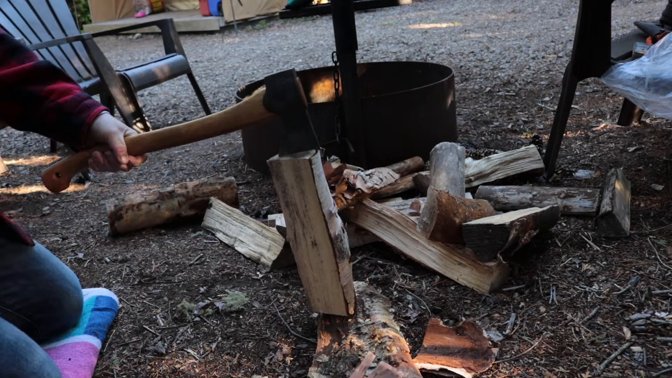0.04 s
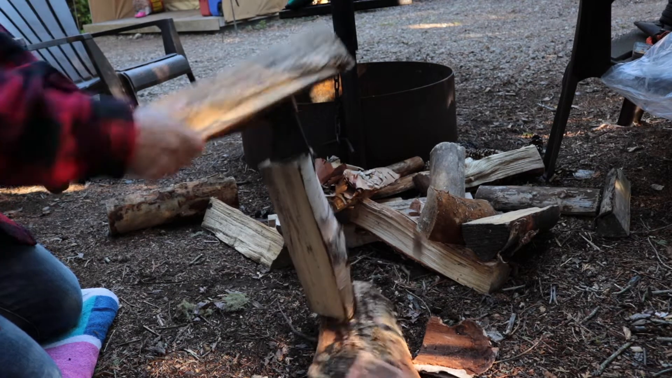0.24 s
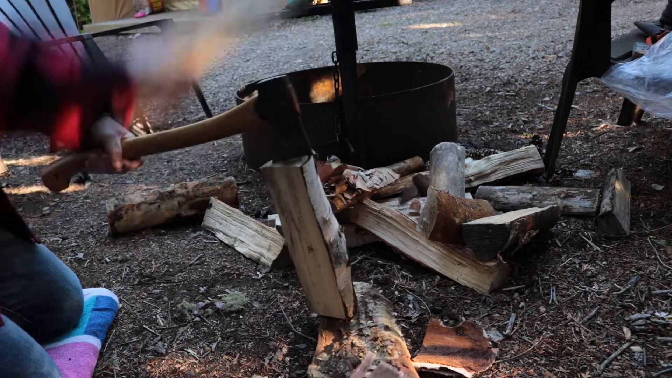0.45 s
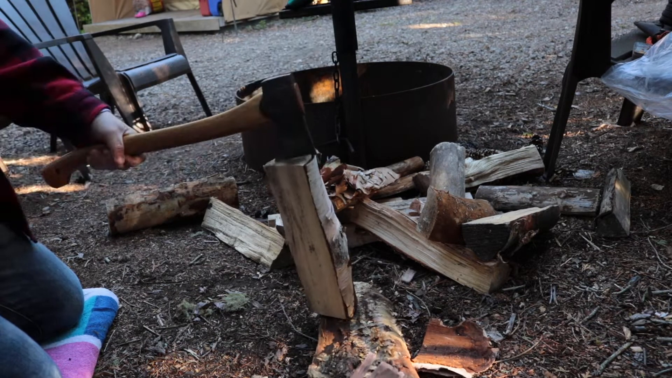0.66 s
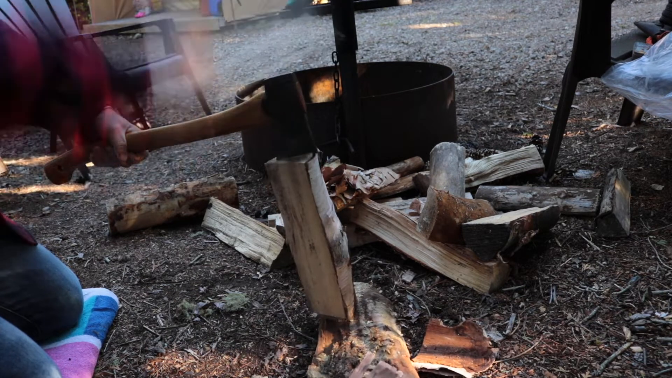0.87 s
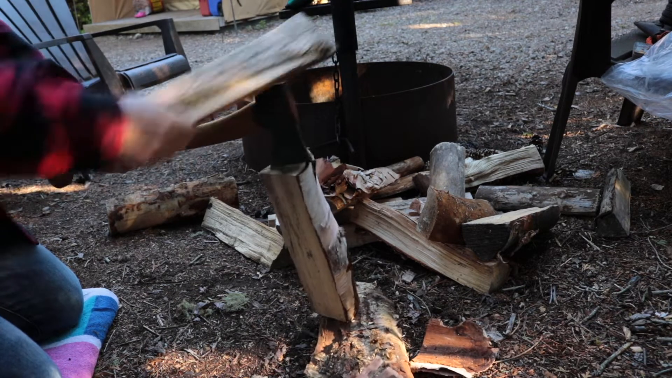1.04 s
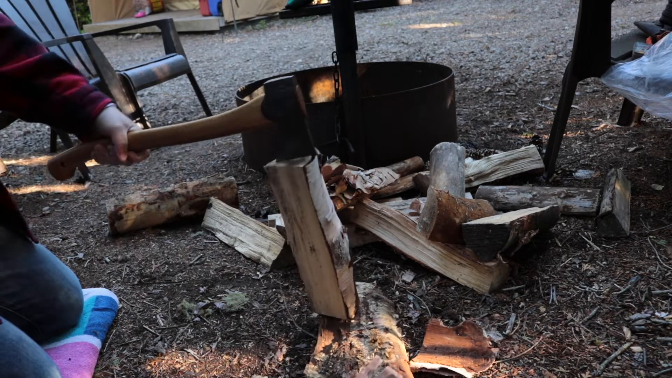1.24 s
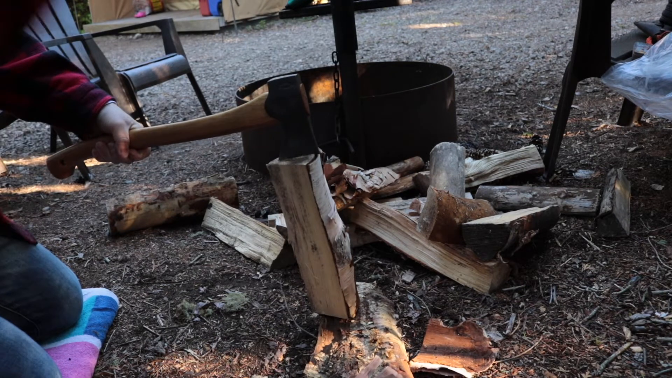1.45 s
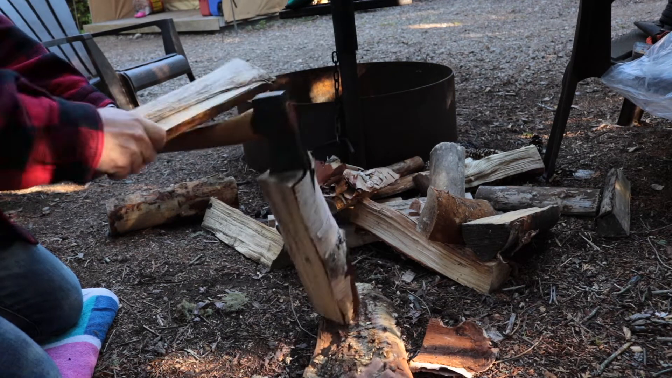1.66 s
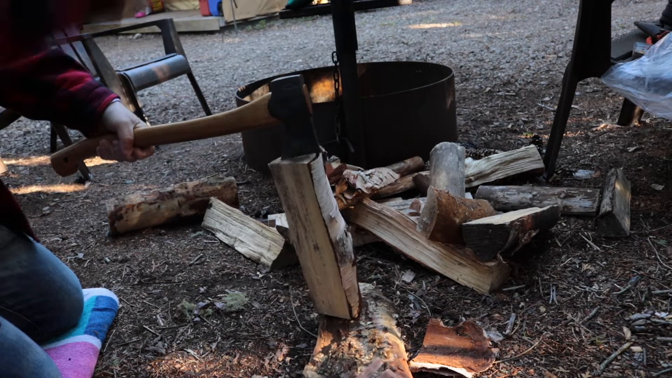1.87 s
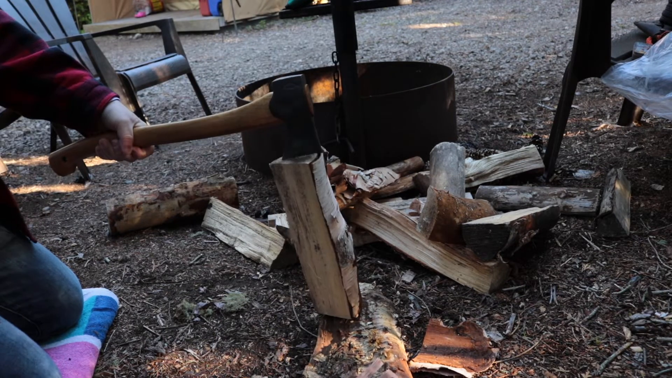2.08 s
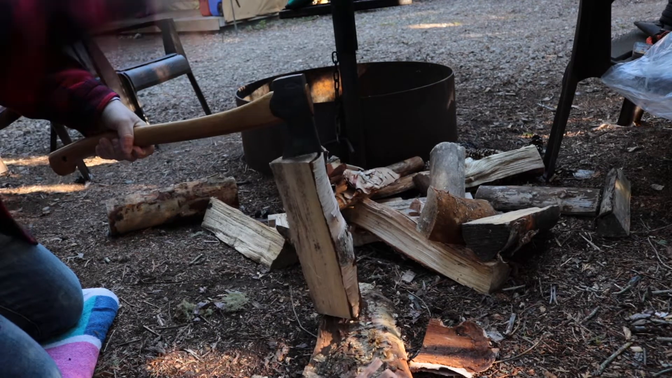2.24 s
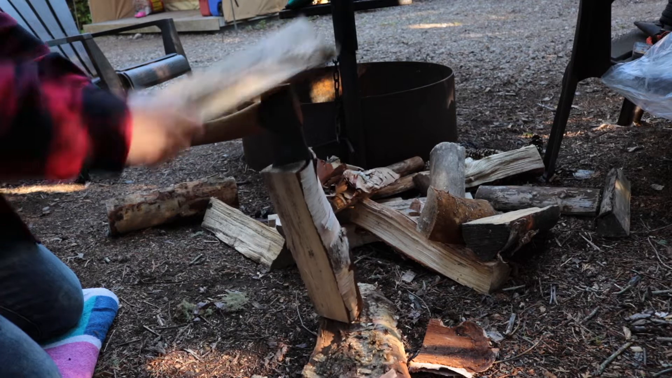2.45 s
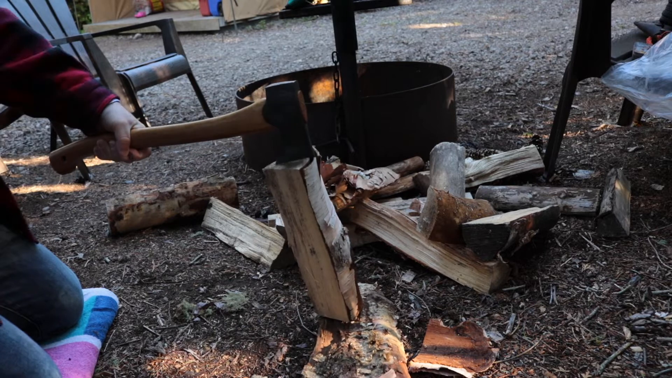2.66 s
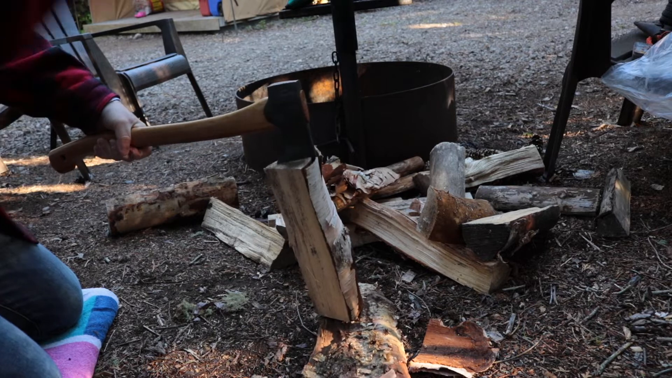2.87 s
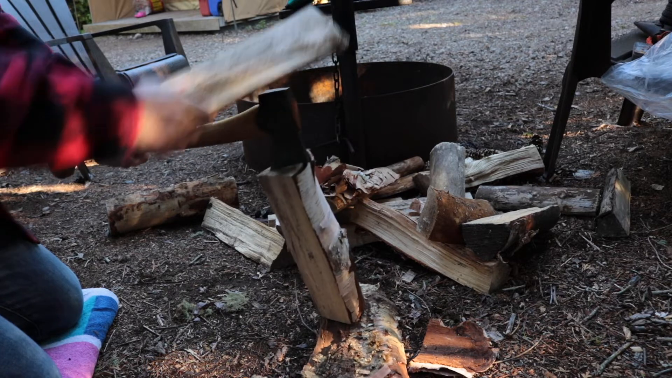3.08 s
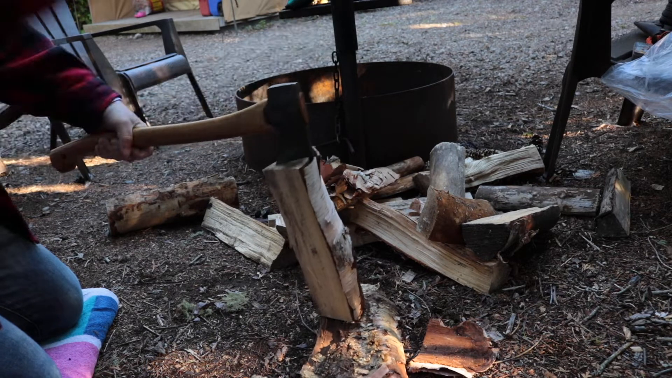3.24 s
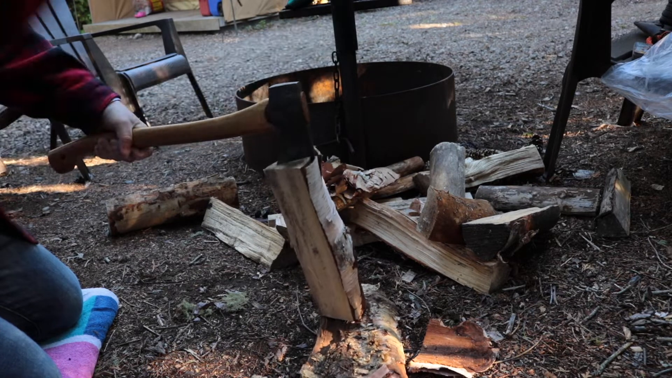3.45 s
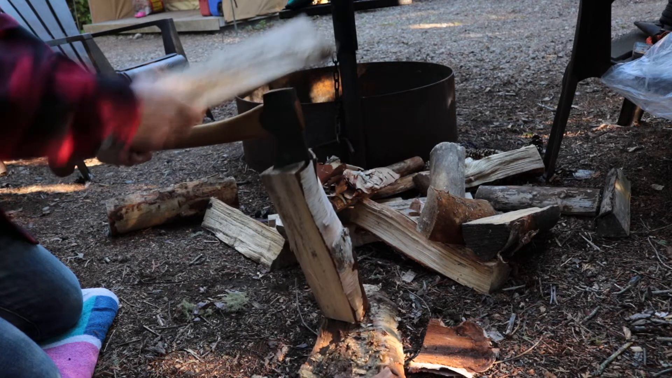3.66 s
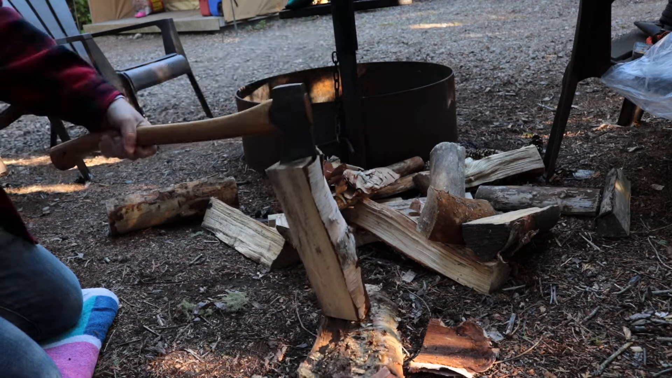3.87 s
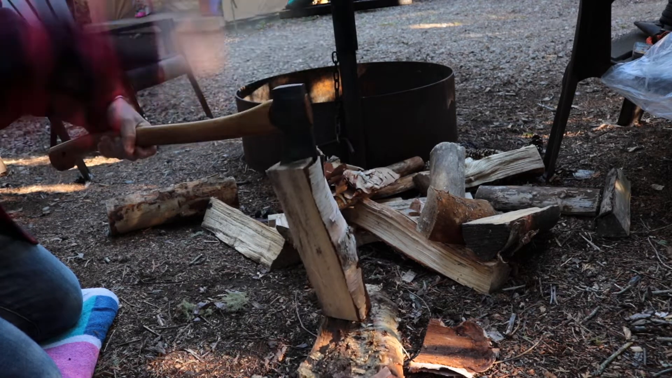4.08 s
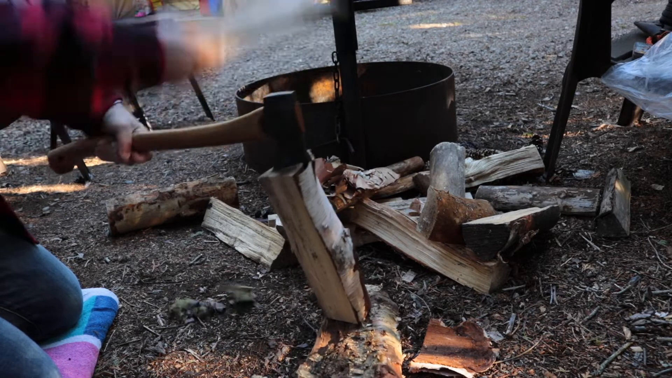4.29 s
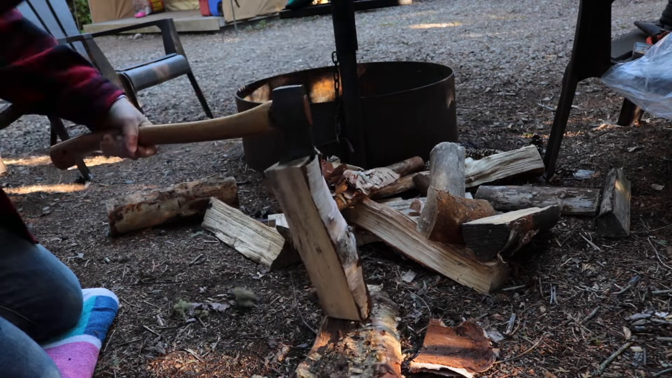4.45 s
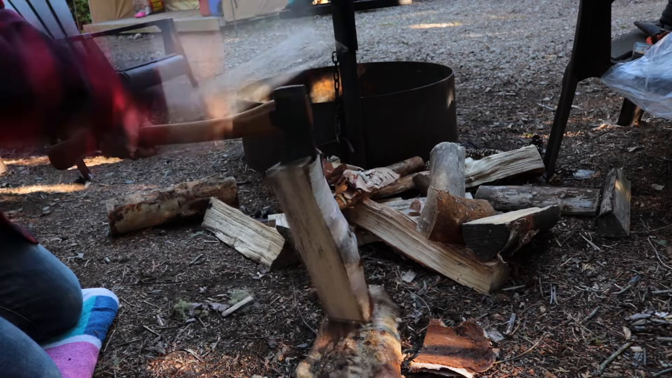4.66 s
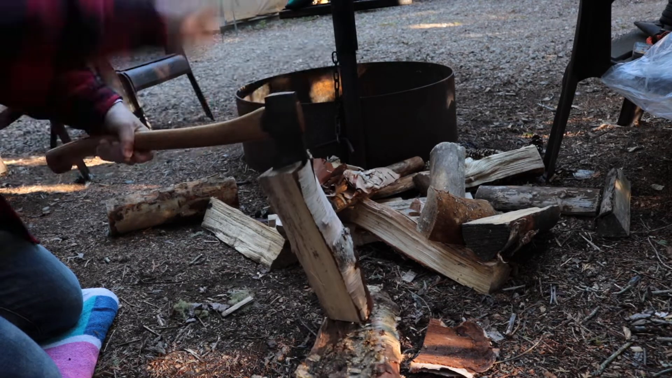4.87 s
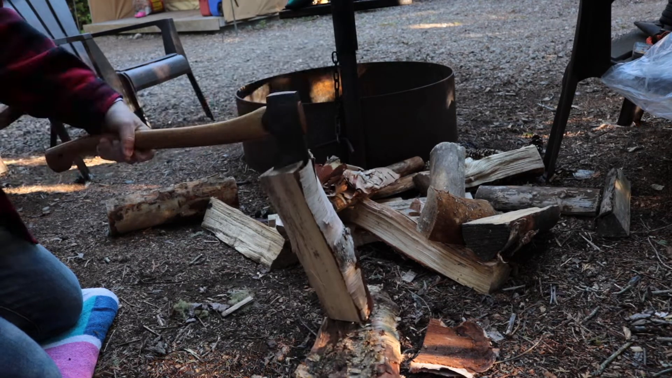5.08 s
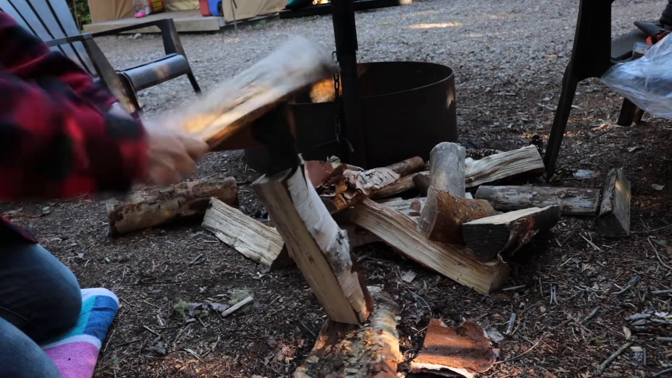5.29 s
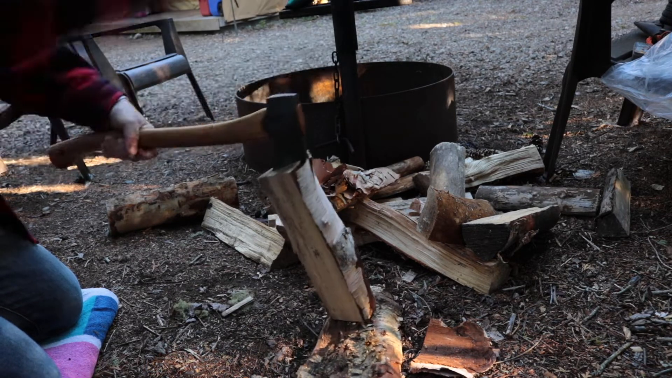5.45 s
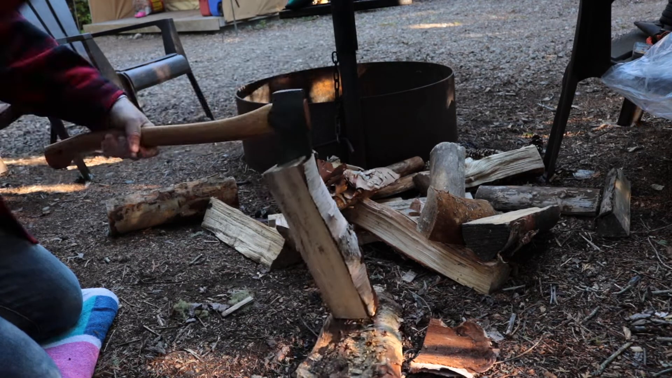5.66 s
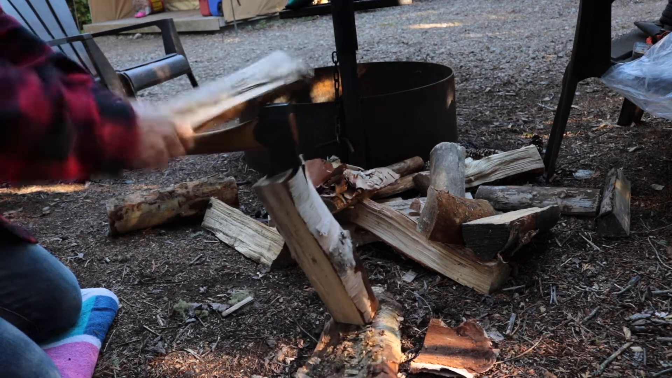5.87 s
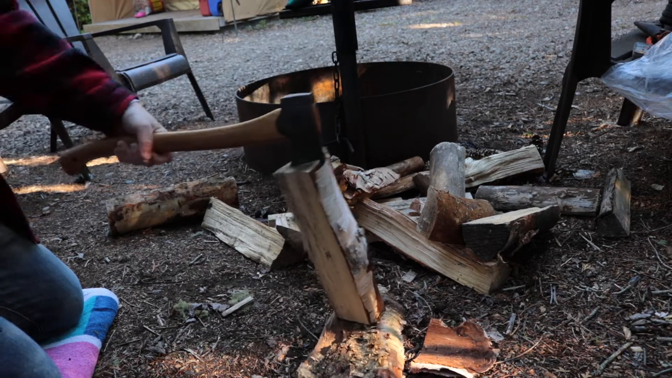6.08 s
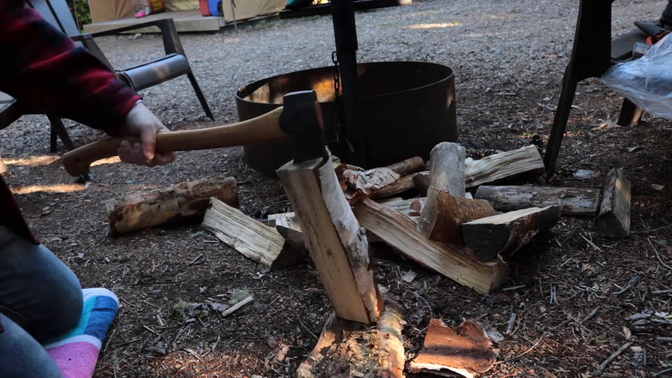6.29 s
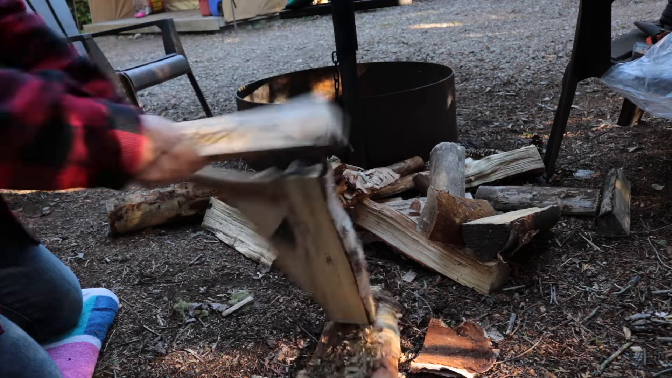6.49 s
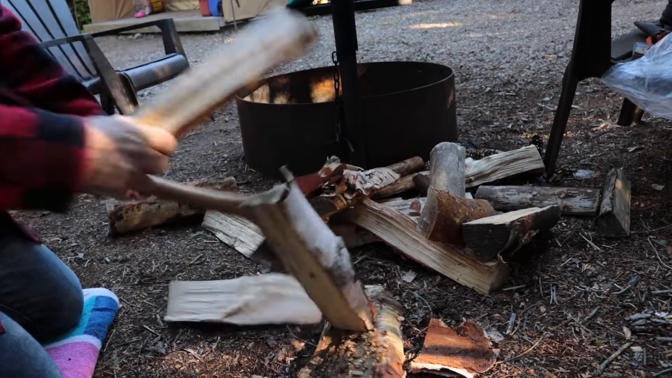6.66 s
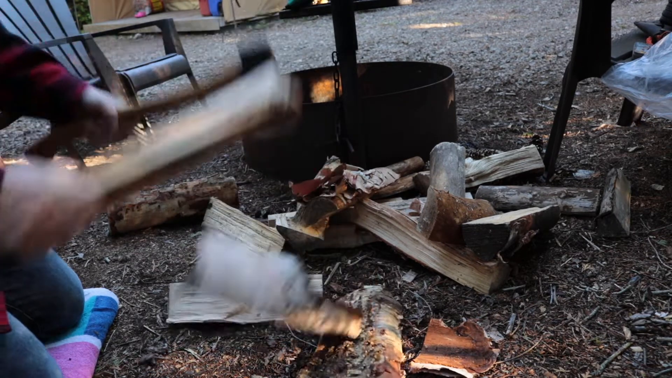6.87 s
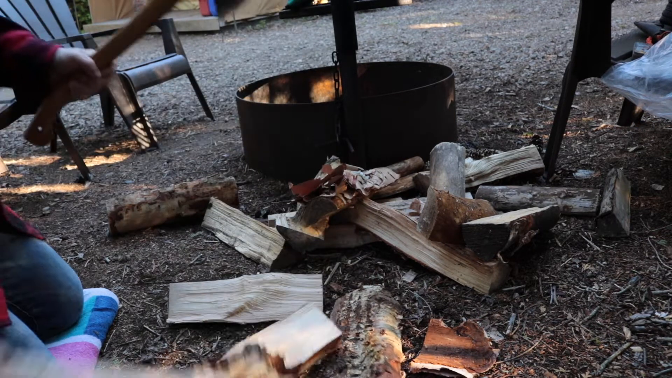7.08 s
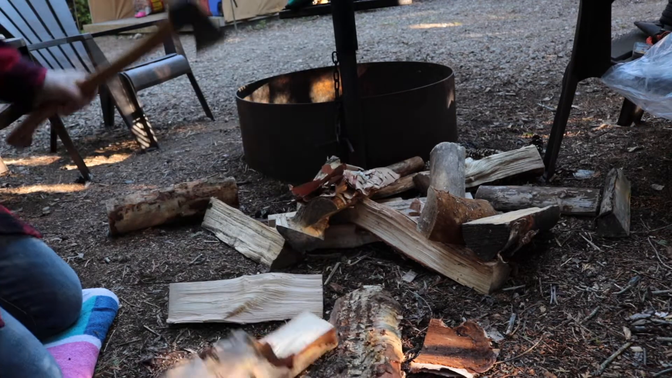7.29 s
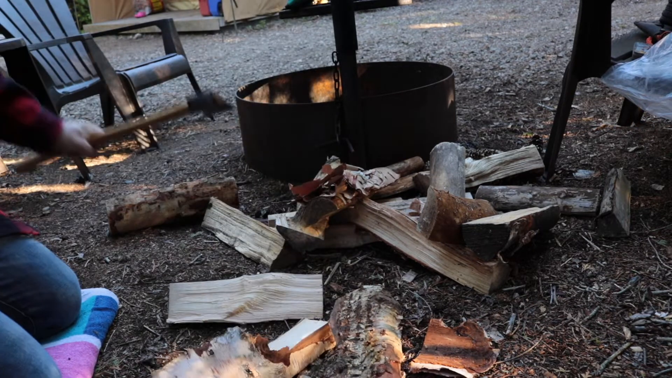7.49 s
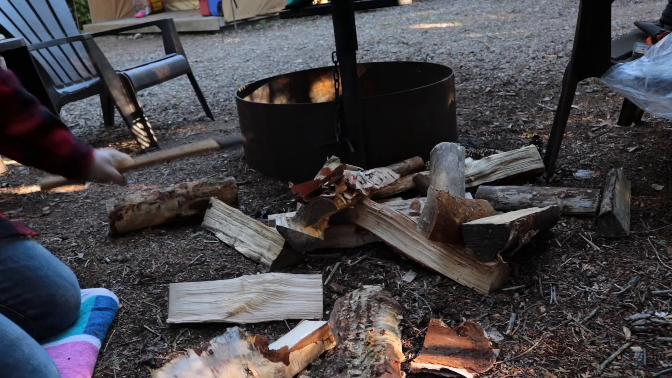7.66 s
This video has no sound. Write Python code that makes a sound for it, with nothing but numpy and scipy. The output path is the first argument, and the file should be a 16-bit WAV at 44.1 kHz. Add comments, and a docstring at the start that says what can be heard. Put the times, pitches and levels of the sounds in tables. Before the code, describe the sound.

A wooden baton knocks on the back of a hatchet lodged in a log, outdoors and close to the microphone. Eleven loud blows fall from 0.2 to 6.5 seconds, about 0.7 seconds apart at first, then slightly quicker. Each is a sharp, slightly distorted knock with a very short metallic ring and a faint echo from trees; all but the last add a low ground thump. The log bumps on its block, and small cracks come at about 2.5 and 4.4 seconds. Just before 6 seconds the log comes down with a hard extra clack, and a sleeve swishes softly. The blow at 6.5 seconds splits the wood with a splintering crack. Pieces thud onto soil at about 6.7 and 7 seconds, clattering and rustling in dry bark and leaves, with small snaps until about 7.7 seconds. Faint wind rumble and distant hiss lie underneath throughout.

```python
"""Outdoors among trees, a wooden baton drives a hatchet through a log on a chopping block.
Each blow rings the tool briefly, overloads the close microphone and bounces the log twice;
all but the last shake the ground, and the trunks echo. The log cracks, is set down hard once,
then splits, and the pieces tumble onto dry litter. Wind, far hiss and a sleeve lie underneath."""
import sys
import numpy as np
from scipy import signal
from scipy.fft import rfft, irfft, next_fast_len
from scipy.io import wavfile
from scipy.ndimage import map_coordinates

SR = 44100
rng = np.random.default_rng(int(sys.argv[2]) if len(sys.argv) > 2 else 0)


def dump_mix(stems):
    """Bounce the given channels to the path in sys.argv[1] as a 16-bit WAV at rate SR."""
    frames = np.atleast_2d(stems).T  # one column per channel
    limited = np.clip(frames, -1, 1)  # hard clip at full scale
    pcm = np.round(limited * 32767).astype(np.int16)
    wavfile.write(sys.argv[1], SR, pcm)


N = 340893
TIME_S = np.arange(N) / SR
AGE_S = np.arange(SR // 3) / SR  # within one impact


def amp(db):
    """Decibels to gain."""
    return 10 ** (np.asarray(db) / 20)


def along(points, hz):
    """Interpolate (hz, value) points on a log frequency axis."""
    point_hz, values = np.transpose(points)
    return np.interp(np.log(hz + 1), np.log(point_hz + 1), values)


def add(track, start_s, sound):
    """Mix a sound into the track."""
    start = max(round(start_s * SR), 0)
    track[start:start + len(sound)] += sound[:max(N - start, 0)]


def coloured(x, spectrum):
    """Shape x by a spectrum, at rms 1."""
    size = next_fast_len(len(x) + 4096)
    gain = amp(along(spectrum, np.fft.rfftfreq(size, 1 / SR)))
    shaped = irfft(rfft(x, size) * gain, size)[:len(x)]
    return shaped / np.sqrt(np.mean(shaped ** 2) + 1e-20)


def low_cut(x, hz):
    """Second-order high-pass."""
    return signal.lfilter(*signal.butter(2, hz, "high", fs=SR), x)


def fade(t60_s):
    """Exponential decay."""
    return np.exp(-np.log(1000) * AGE_S / t60_s)


def ring(modes, detune, scatter_db=1.5):
    """Damped modes; level and pitch vary per strike."""
    return sum(amp(db + scatter_db * rng.normal()) * fade(t60_s)
               * np.sin(2 * np.pi * hz * (1 + detune * rng.normal()) * AGE_S)
               for hz, db, t60_s in modes)


def clumps(count, hold_samples, spread_db):
    """Stepped random gain."""
    return amp(spread_db * np.repeat(np.clip(rng.standard_normal(count), -2, 2), hold_samples))


# wind contour: time_s, level_db
WIND_LEVEL = [(0.0, -42.5), (2.33, -36.5), (2.67, -46), (3.05, -37.5), (3.4, -47), (4.17, -36),
              (4.28, -43.5), (7.45, -41.5), (7.73, -40)]
# wind spectrum: freq_hz, density_db
WIND_SPECTRUM = [(12, -32.5), (20, 3.5), (43, 5.5), (77, 1.5), (107, -0.5), (150, -7), (214, -21),
                 (248, -19), (400, -27.5), (520, -68.5), (880, -120)]
# far hiss spectrum: freq_hz, density_db
HISS_SPECTRUM = [(150, 8.5), (300, -0.5), (600, 0), (1000, -3), (2000, -8.5), (2800, -7.5), (3700, -0.5),
                 (4500, -9.5), (5500, -15.5), (8000, -19.5), (12000, -26), (16000, -21.5)]


def wind_and_hiss(lift_db=3.5, gust_db=3, gust_knots_per_s=4.4):
    """Gently gusting wind rumble under a steady far hiss."""
    gusts = map_coordinates(rng.standard_normal(200), [TIME_S * gust_knots_per_s], mode="wrap")
    wind_db = np.interp(TIME_S, *np.transpose(WIND_LEVEL)) + lift_db + gust_db * gusts
    rumble = low_cut(coloured(rng.standard_normal(N), WIND_SPECTRUM), hz=30.8)
    hiss = coloured(rng.standard_normal(N), HISS_SPECTRUM)
    return amp(wind_db) * rumble + amp(-50) * hiss


# echo decay: freq_hz, t60_s
ECHO_DECAY = [(100, 0.27), (600, 0.46), (1400, 0.77), (3200, 0.52), (6000, 0.32), (14000, 0.35)]
# echo colour: freq_hz, gain_db
ECHO_SPECTRUM = [(80, -0.5), (400, -4), (750, -1.5), (1050, 1), (1340, -3.5), (1700, -2), (2200, -2.5),
                 (3100, 5), (4200, -3), (6000, -2), (15000, -10)]


def tree_echo(sound):
    """Diffuse return from the trunks."""
    hz, t, noise = signal.stft(rng.standard_normal(SR), SR, nperseg=256)
    decay = np.exp(-np.log(1000) * t / along(ECHO_DECAY, hz)[:, None])
    onset = 1 - np.exp(-t / 0.0044)
    colour = amp(along(ECHO_SPECTRUM, hz))[:, None]
    _, tail = signal.istft(noise * decay * onset * colour, SR, nperseg=256)
    return signal.fftconvolve(sound, tail / np.linalg.norm(tail))


def echoed(sound, echo_db):
    """Direct sound plus tree echo."""
    out = amp(echo_db) * tree_echo(sound)
    out[:len(sound)] += sound
    return out


# arm swings: peak_s, level_db, half_width_s
SWISHES = [(1.32, -55, 0.041), (2.016, -57, 0.065), (3.294, -53.5, 0.052), (3.53, -55, 0.1),
           (5.04, -59, 0.086), (5.558, -53.5, .06), (5.755, -54, 0.069), (6.034, -43.5, .12)]
# cloth friction spectrum: freq_hz, density_db
CLOTH_SPECTRUM = [(500, -11.5), (2000, 0), (4000, 5.5), (6000, -5), (8500, -12), (12000, -20),
                  (16000, -22.5)]


def sleeve():
    """Cloth brushes on cloth as the arm moves."""
    motion = sum(amp(db) * np.exp(-((TIME_S - peak_s) / half_width_s) ** 2)
                 for peak_s, db, half_width_s in SWISHES)
    return motion * coloured(rng.standard_normal(N), CLOTH_SPECTRUM)


# litter rustles: peak_s, level_db, release_s
RUSTLES = [(.24, -48, 0.3), (.66, -47.5, 0.053), (1.8, -57, 0.28), (6.51, -45.5, 0.19), (6.63, -43, 0.16),
           (6.70, -35.5, 0.03), (6.945, -40.5, 0.06), (7.034, -42.5, 0.15), (7.18, -43, .16),
           (7.379, -47.5, 0.23)]
# dry bark and leaf spectrum: freq_hz, density_db
LITTER_SPECTRUM = [(300, -3), (1500, 2), (4000, 2.5), (6500, -5), (10000, -5.5), (16000, -12)]


def litter(attack_s=0.05, range_db=28, grains_per_s=3500):
    """Bark and leaves crackle when pushed about; attack and release each span range_db."""
    stir = sum(amp(db - range_db * np.maximum((peak_s - TIME_S) / attack_s,
                                              (TIME_S - peak_s) / release_s))
               for peak_s, db, release_s in RUSTLES)
    grains = rng.standard_normal(N) * (rng.random(N) < grains_per_s / SR)
    sizes = clumps(N // 150 + 1, hold_samples=150, spread_db=3.5)[:N]
    return stir * coloured(grains * sizes, LITTER_SPECTRUM)


# wood crackle spectrum: freq_hz, density_db
CRACK_SPECTRUM = [(300, -17.5), (1000, -6), (3200, 5), (6000, -10.5), (10000, -13), (16000, -20)]


def crack(t60_s, tilt_db_per_oct, spread_db=4):
    """A dying burst of fine, uneven wood crackle."""
    length = len(AGE_S)
    sizes = clumps(length, hold_samples=12, spread_db=spread_db)[:length]
    spectrum = [(hz, db + tilt_db_per_oct * np.log2(hz / 3000)) for hz, db in CRACK_SPECTRUM]
    return coloured(sizes * rng.standard_normal(length), spectrum) * fade(t60_s)


# fibre and twig snaps: start_s, level_db, t60_s, tilt_db_per_oct
SNAPS = [(.074, -37, 0.0073, 7), (0.275, -34, 0.014, 8), (2.4251, -24.5, .019, -6),
         (2.6009, -18, 0.0089, 2), (4.2647, -36.5, 0.073, 5.5), (4.3592, -10, 0.023, 0),
         (6.478, -7, .038, -3), (6.491, -5.5, 0.015, 15), (6.496, -18, 0.031, 3.5),
         (6.585, -26.5, 0.0088, 10), (6.704, -17, 0.02, -3), (7.028, -17, 0.022, 4.5),
         (7.14, -29, 0.031, 1), (7.1566, -22, 0.019, 0.5), (7.2366, -29, 0.0091, 0),
         (7.5185, -37, 0.011, 5), (7.6627, -36.5, 0.049, 4)]


def splinters(ticks_per_s=3, tick_min_db=-44.75, tick_range_db=7):
    """Strained fibres and twigs snap, and tick faintly at random."""
    out = np.zeros(N)
    for start_s, db, t60_s, tilt_db_per_oct in SNAPS:
        add(out, start_s, echoed(amp(db) * crack(t60_s, tilt_db_per_oct), echo_db=-31))
    for place, size in rng.random((round(ticks_per_s * N / SR), 2)):
        tick = crack(t60_s=0.012, tilt_db_per_oct=4.8)
        add(out, place * N / SR, amp(tick_min_db + tick_range_db * size) * tick)
    return out


# landings on soil: start_s, level_db
THUDS = [(6.692, -5.5), (6.7097, -10), (7.025, -8), (7.039, -11)]
# soil modes: pitch_hz, level_db, t60_s
SOIL_MODES = [(58, -4, 0.14), (106.3, 0.5, 0.067), (196, -2.5, 0.041), (322, -17, 0.062)]


def soil_thuds():
    """Split pieces land on the soil."""
    out = np.zeros(N)
    for start_s, db in THUDS:
        thud = ring(SOIL_MODES, detune=0.052) * (1 - np.exp(-AGE_S / 0.0036))
        add(out, start_s, amp(db) * low_cut(thud, hz=35.2))
    return out


# wood-on-wood hits: start_s, level_db, pitch_ratio, tilt_db_per_oct
CLACKS = [(0.2243, -14.5, 0.98, -7.5), (0.2764, -27.5, 1.08, -8), (4.3585, -23.5, 1.2, 3),
          (5.9554, 7, 0.98, -2.5), (5.9621, -3.5, 1, -6), (6.53, -31, .9, 0.5), (6.609, -21, 0.796, -7.5),
          (6.7066, -20, 1.29, 7.5), (7.0227, -20, .92, -5), (7.1082, -30.5, 1.02, 1),
          (7.145, -27.5, 1.1, -3), (7.1842, -18.5, 0.97, -4.5)]
# modes of a free piece: pitch_hz, level_db, t60_s
PIECE_MODES = [(386, -18.5, 0.033), (620, -27, 0.016), (950, -36, 0.028), (1099, -5.5, 0.033),
               (1525, -1, 0.033), (1710, -7.5, 0.018), (2317, -21, 0.0092), (2770, -7, 0.046),
               (2990, -21, 0.065), (3605, 6, 0.01), (4610, 8.5, 0.003), (6100, -2.5, 0.0094)]


def loose_wood():
    """Free pieces clack, brighter on hard contacts."""
    out = np.zeros(N)
    for start_s, db, pitch_ratio, tilt_db_per_oct in CLACKS:
        modes = [(hz * pitch_ratio, mode_db + tilt_db_per_oct * np.log2(hz / 1500), t60_s)
                 for hz, mode_db, t60_s in PIECE_MODES]
        piece = ring(modes, detune=0.008) * (1 - np.exp(-AGE_S / 0.0005))
        grit = low_cut(crack(t60_s=0.034, tilt_db_per_oct=tilt_db_per_oct - 3), hz=503)
        add(out, start_s, echoed(amp(db) * (piece + amp(-1) * grit), echo_db=-38))
    return out


# modes of the log on the block: pitch_hz, level_db, t60_s
LOG_MODES = [(265, -10, 0.027), (352, -3.5, 0.025), (713, -3.5, 0.021), (835, -9.5, 0.04)]
# end grain contact spectrum: freq_hz, density_db
END_GRAIN_SPECTRUM = [(60, -17.5), (250, -7), (450, -8), (780, 3.5), (1200, -12), (2000, -16),
                      (4000, -27.5), (15000, -50)]


def log_knock(cutoff_hz):
    """The log's rough end thumps the block; a softer contact has a lower cutoff."""
    body = ring(LOG_MODES, detune=0.04)
    grain = coloured(rng.standard_normal(len(AGE_S)), END_GRAIN_SPECTRUM) * fade(0.022)
    softened = signal.lfilter(*signal.butter(2, cutoff_hz, fs=SR), amp(-0.5) * grain - body)
    return low_cut(softened, hz=132)


# log drops: start_s, level_db, cutoff_hz
LOG_DROPS = [(0.2645, -22.5, 900), (2.4320, -11.5, 1730), (4.209, -23, 683), (5.8855, -16.5, 1200),
             (5.992, -27, 800)]


def rocking_log(bounce_delay_s=0.04):
    """The log bounces twice per blow; now and then it tips and drops back."""
    out = np.zeros(N)
    for start_s, *_, rebound_delay_s, rebound_db, bounce_db in BLOWS:
        add(out, start_s + rebound_delay_s, amp(rebound_db) * log_knock(cutoff_hz=1800))
        add(out, start_s + bounce_delay_s, amp(bounce_db) * log_knock(cutoff_hz=630))
    for start_s, db, cutoff_hz in LOG_DROPS:
        add(out, start_s, echoed(amp(db) * log_knock(cutoff_hz), echo_db=-29))
    return out


def ground_shudder(level_db=-8, pitch_hz=59, delay_s=0.017):
    """The block passes each blow to the ground, except the last, which is spent on the split."""
    out = np.zeros(N)
    shudder = fade(0.093) * (1 - np.exp(-AGE_S / 0.002)) * np.sin(2 * np.pi * pitch_hz * AGE_S)
    for start_s, *_ in BLOWS[:-1]:
        add(out, start_s + delay_s, amp(level_db) * low_cut(shudder, hz=34))
    return out


# baton blows: start_s, level_db, pitch_hz, body_rel_db, contact_rel_db, echo_rel_db,
# rebound_delay_s, rebound_db, bounce_db
BLOWS = [(0.1907, 6.5, 1351, 9.5, -4.5, -36, 0.012, -6, -36),
         (0.9218, 16, 1355, -1.5, -7, -37, 0.014, -3.5, -12),
         (1.5682, 15.5, 1355, -4, -2.5, -37, 0.016, -3, -28.5),
         (2.3195, 19, 1343, -9, -6, -35.5, 0.016, -2, -14.5),
         (2.9798, 12.5, 1336, 0.5, -5, -39.5, 0.012, 1.5, -18),
         (3.576, 18, 1341, -5, -8.5, -38, .0163, -4, -14.5),
         (4.1394, 15.5, 1332, -2.5, -7.5, -40, 0.014, 2.5, -20),
         (4.7102, 16, 1333, -10, -8, -37.5, .0178, -4.5, -17),
         (5.2634, 19.5, 1343, -10, -8, -36.5, 0.021, -7, -11),
         (5.8199, 21, 1337, -10, -10, -39.5, 0.019, -10.5, -25),
         (6.465, 18.5, 1337, -1.5, -11.5, -43, 0.014, -10, -35)]
# baton body modes: pitch_hz, level_db, t60_s
BATON_MODES = [(352, -10.5, .02), (746, 2.5, 0.012), (1128, -9.5, 0.023), (1531, -7.5, 0.019),
               (2845, -10.5, 0.016), (3467, -13, 0.0053)]


def baton_blows(bark_db=-33.5):
    """Each blow rings the hatchet until the log's rebound mutes it; shaken loose bark crackles."""
    out = np.zeros(N)
    for start_s, db, pitch_hz, body_rel_db, contact_rel_db, echo_rel_db, rebound_delay_s, *_ in BLOWS:
        muting = np.exp(-np.maximum(AGE_S - rebound_delay_s, 0) / 0.0074)
        tone = fade(0.051) * muting * np.sin(2 * np.pi * pitch_hz * AGE_S)
        push = amp(10) * fade(0.0043) * np.sin(2 * np.pi * 480 * AGE_S)
        body = amp(body_rel_db) * ring(BATON_MODES, detune=0.018)
        contact = amp(contact_rel_db) * crack(t60_s=0.024, tilt_db_per_oct=-1, spread_db=0.5)
        wood = low_cut(push + body + contact, hz=186.5)  # a thin log radiates little bass
        add(out, start_s, amp(db) * (tone + wood))
        bark_crumbs = crack(t60_s=0.07, tilt_db_per_oct=1.5)
        add(out, start_s + rebound_delay_s, amp(bark_db) * bark_crumbs)
        to_trees = amp(1) * tone * fade(0.05) + amp(0.5) * contact + amp(-6) * (body + push)
        add(out, start_s, amp(db + echo_rel_db) * tree_echo(to_trees))
    return out


def scene():
    """All sources at one microphone."""
    chopping = baton_blows() + rocking_log() + ground_shudder()
    debris = loose_wood() + soil_thuds() + splinters() + litter()
    return (chopping + debris + sleeve() + wind_and_hiss())[None]


def record(dry, clip_db=-4, ceiling_db=-4.5, cutoff_hz=15900):
    """The input clips hard on the blows, then is band-limited."""
    oversampled = signal.resample_poly(dry, 2, 1, axis=-1)
    clipped = np.clip(oversampled / amp(clip_db), -1, 1) * amp(ceiling_db)
    downsampled = signal.resample_poly(clipped, 1, 2, axis=-1)
    lowpass = signal.firwin(255, cutoff_hz, fs=SR)
    return signal.fftconvolve(downsampled, lowpass[None], mode="same", axes=1)


dry = scene()
out = record(dry)
dump_mix(out)
```